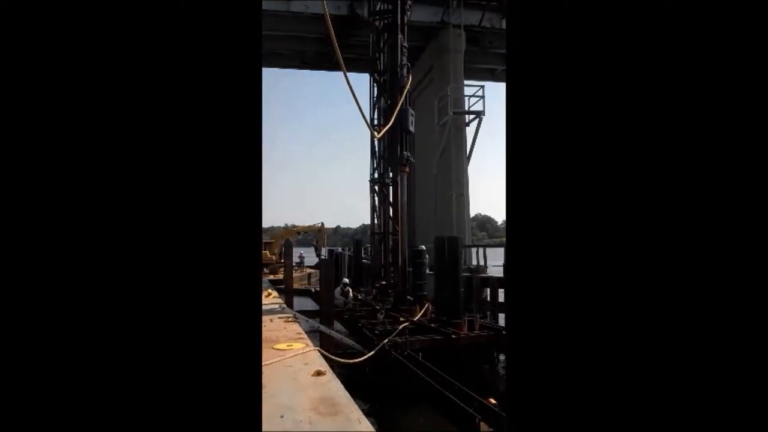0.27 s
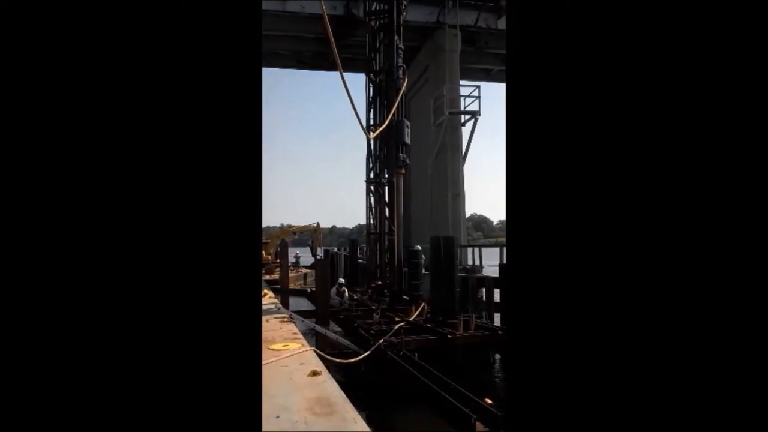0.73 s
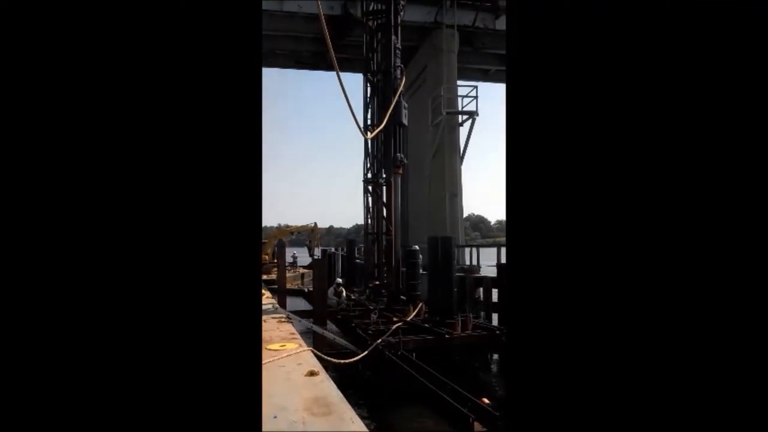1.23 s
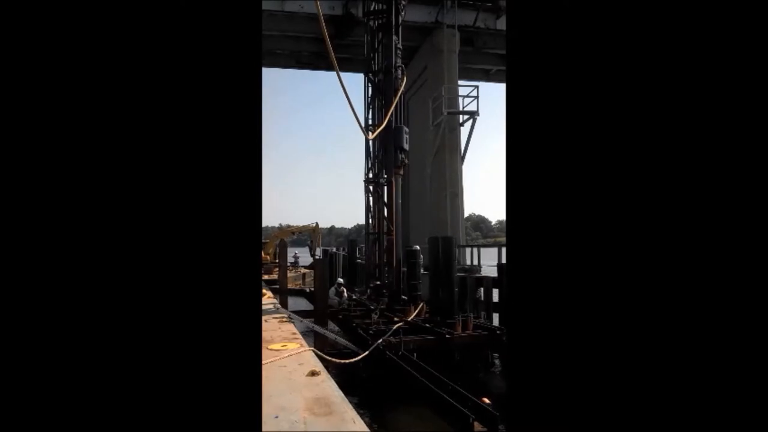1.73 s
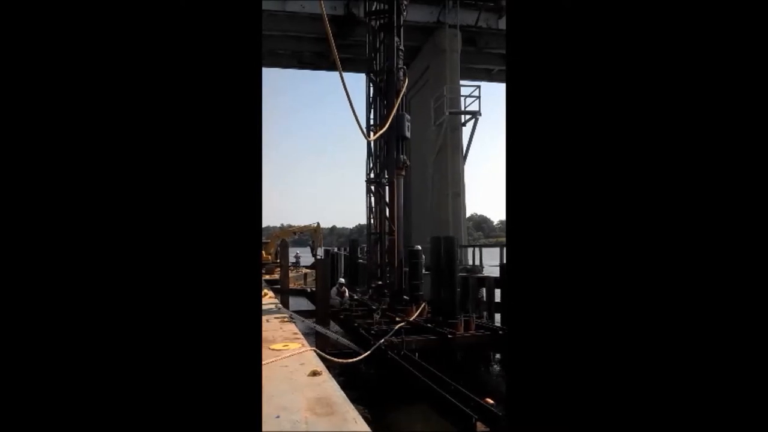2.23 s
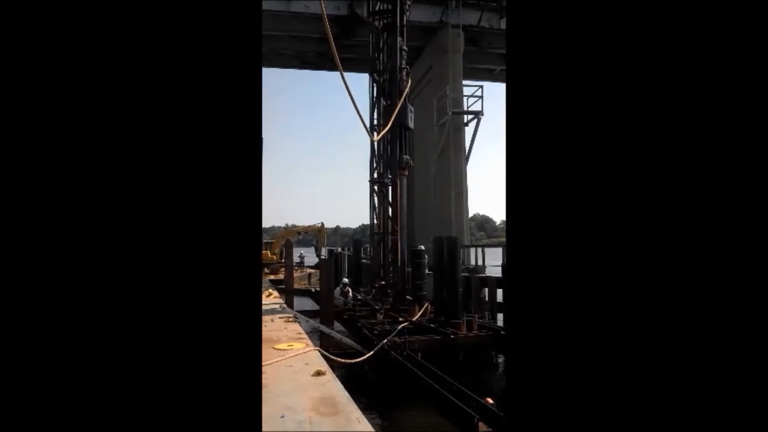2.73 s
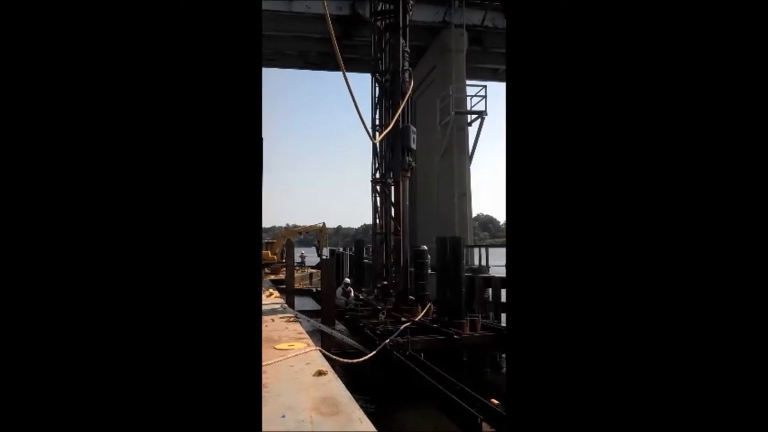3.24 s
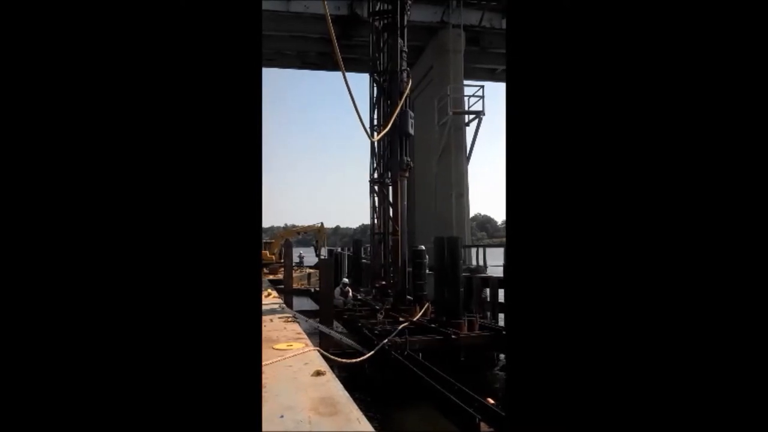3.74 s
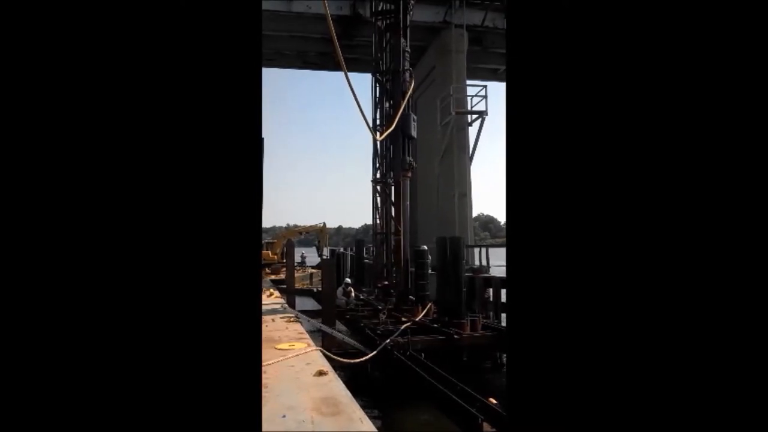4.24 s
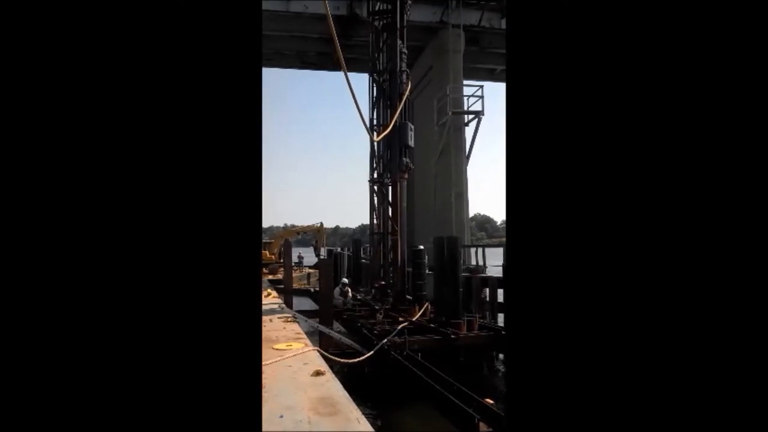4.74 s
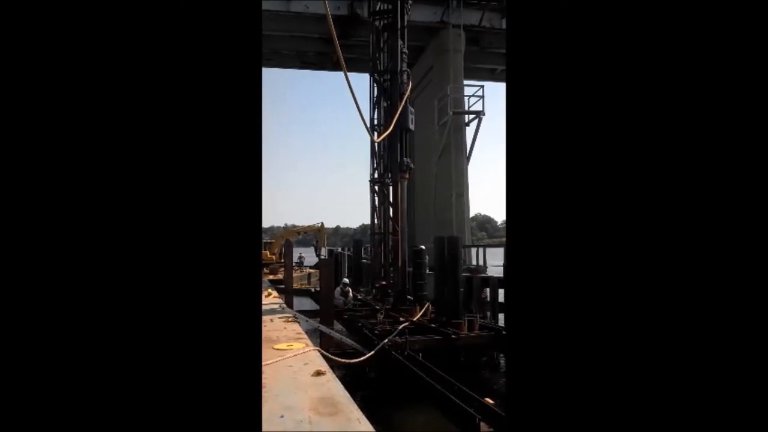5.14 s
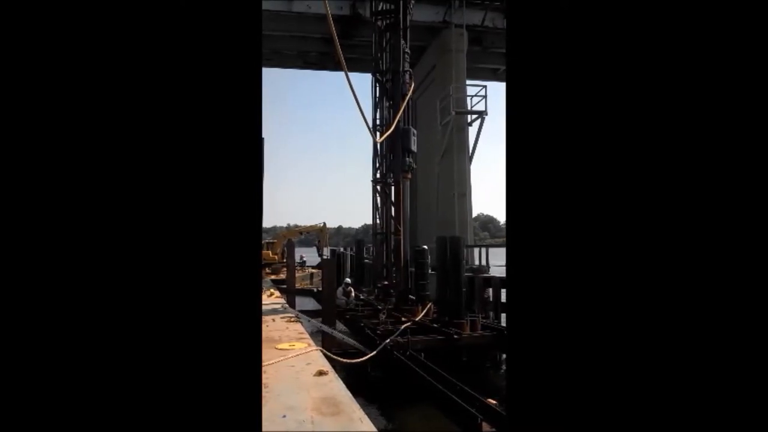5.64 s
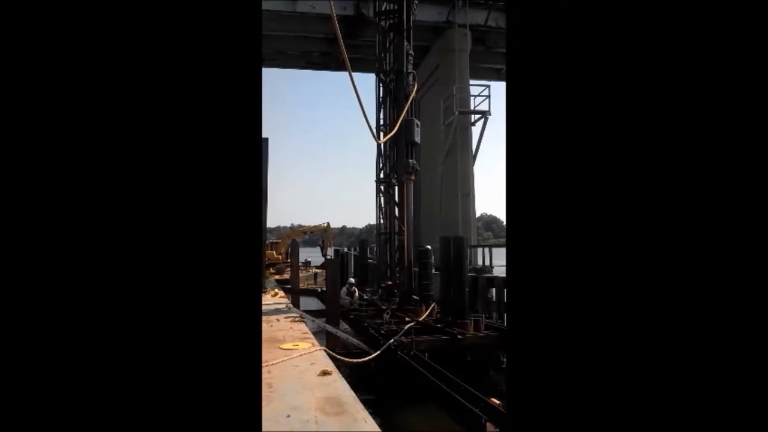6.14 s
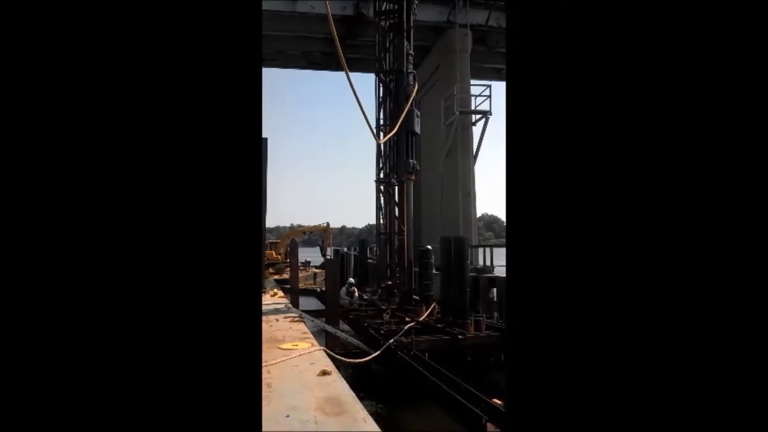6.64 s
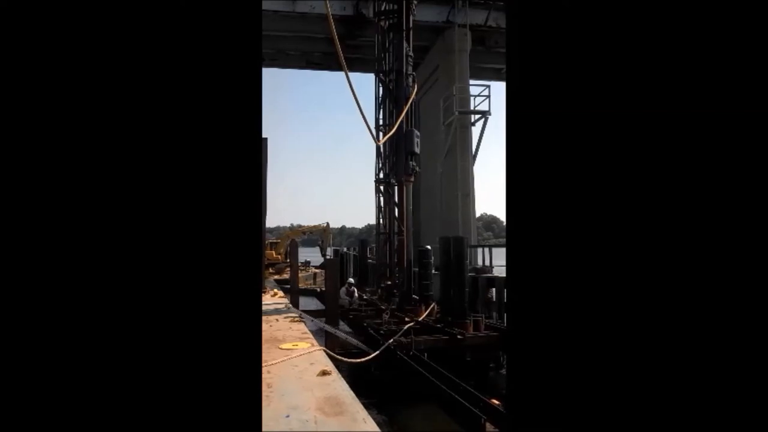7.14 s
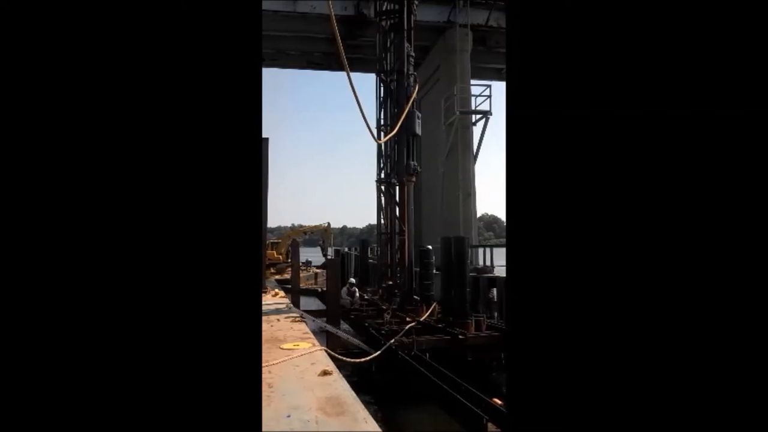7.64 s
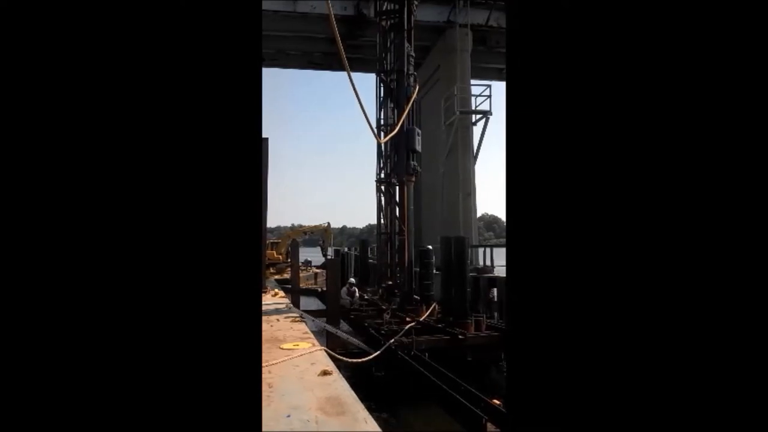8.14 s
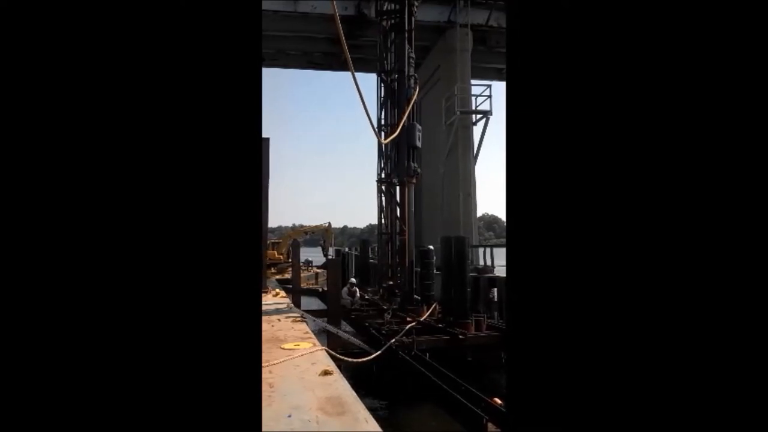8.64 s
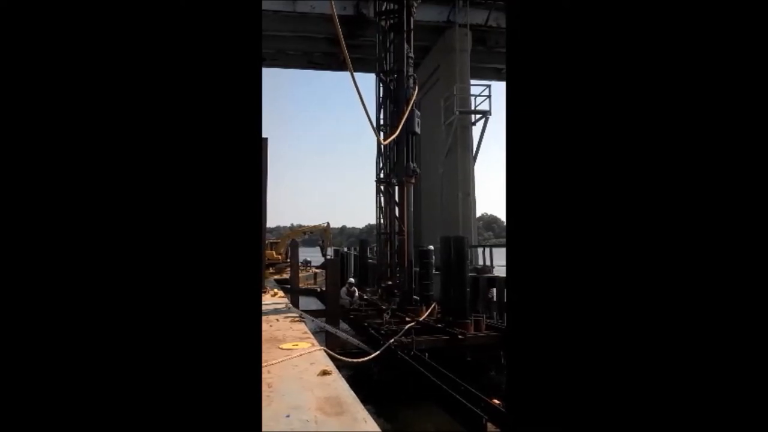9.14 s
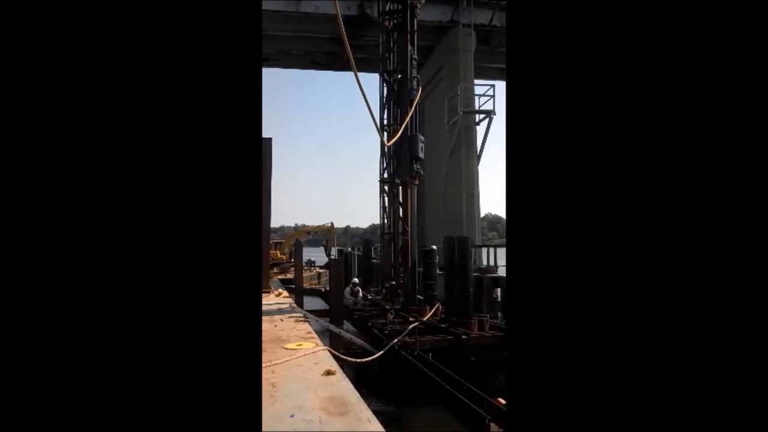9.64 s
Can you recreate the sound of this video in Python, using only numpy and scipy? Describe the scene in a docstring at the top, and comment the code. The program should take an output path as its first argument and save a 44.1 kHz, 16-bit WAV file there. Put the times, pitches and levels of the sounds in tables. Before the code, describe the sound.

Under a bridge beside water, an air hammer drives a pile. A soft exhaust puff comes first, then a short valve rasp and a hard metallic blow with a fast stuttering thud, booming reflection and ringing steel. The cycle repeats every 1.3 seconds, eight blows in all, over a constant compressor drone and hiss. A phone nearby captures it in stereo, mildly compressing the peaks.

```python
"""An air hammer drives a pile under a bridge by the water. Each stroke is a valve rasp, a blow whose thud
bounces down the pile, a swell thrown back by deck and piers, ringing steel, then a puff of exhaust air.
Impacts and air are noise dying band by band; steel is dying sine modes, some kept shaking by loose parts.
Loose steel clinks a few times, and behind it all a compressor drones and hisses.
A phone with two microphone ports and mild gain control listens."""
import sys
import numpy as np
from scipy import signal
from scipy.fft import rfft, irfft, next_fast_len
from scipy.io import wavfile
from scipy.ndimage import uniform_filter1d

SR = 44100
rng = np.random.default_rng(int(sys.argv[2]) if len(sys.argv) > 2 else 0)


def unload_wav(signal):
    """Save mono or channel-first audio to the path in sys.argv[1] as 16-bit WAV at rate SR, clipped to [-1, 1]."""
    wavfile.write(
        sys.argv[1],
        SR,
        np.round(np.clip(np.atleast_2d(signal).T, -1, 1) * 32767).astype(np.int16),
    )


N = 436149
PAD, LONG = 4410, 45000  # lead-in before time zero and longest single sound, samples

# Bright colour of steel hitting steel. Each row: frequency in Hz, relative level in dB.
SNAP_COLOUR = [(1500, -32), (3000, 6), (7000, -3.5), (11500, -7), (15500, -8)]


def blow(mix, s, db, helmet_db, ram_db):
    """One stroke: contact crack and bouncing thud, then the late loud return while the steel rings."""
    contact(mix, s, db)
    pile_thud(mix, s, db)
    bridge_swell(mix, s, db)
    ringing_steel(mix, s, db, helmet_db, ram_db)


def contact(mix, s, db):
    """Ram meets anvil: a broad crack, a very short bright snap and a shaken ping."""
    # Crack colour. Each row: frequency in Hz, relative level in dB.
    crack_colour = [(40, -30), (95, -30), (150, -18), (400, 9), (700, -1), (1400, -0.5), (2200, -6),
                    (3500, -7), (5500, -8.5), (8000, -11), (11000, -21), (15500, -23)]
    # How fast the crack dies. Each row: frequency in Hz, time to fall 60 dB in seconds.
    crack_t60 = [(150, 0.7), (500, 0.94), (1500, 1), (4000, 0.18), (10000, 0.13)]
    # How fast the snap dies. Each row: frequency in Hz, time to fall 60 dB in seconds.
    snap_t60 = [(3000, .06), (10000, 0.02)]
    # Anvil ping modes. Each row: pitch in Hz, level in dB, time to fall 60 dB in seconds.
    anvil = [(6900, 3.5, 0.022), (3060, -28, 0.048)]
    crack_db, snap_db, ping_db = -10.5, -14, -9  # against the strength of the blow
    crack = burst(crack_colour, crack_t60, rise=0.0027, hold=0.01, spit_db=0.5)
    snap = burst(SNAP_COLOUR, snap_t60, rise=0.00031, hold=0.0031, spit_db=1.0)
    ping = rattle(anvil, rise=0.00089, width=360)
    add(mix, s, gain_of(db + crack_db) * crack)
    add(mix, s, gain_of(db + snap_db) * snap)
    add(mix, s, gain_of(db + ping_db) * ping)


def pile_thud(mix, s, db):
    """The pile body's low modes, repeated for each return along the pile."""
    # Pile body modes. Each row: pitch in Hz, level in dB, time to fall 60 dB in seconds.
    pile_modes = [(146, -12.5, 0.029), (291, 6.5, 0.01), (398, -2.5, 0.019), (560, -7.5, 0.016),
                  (284, -19.5, 0.26)]
    time_scatter, level_scatter_db = .006, 1.5  # random spread of delay (share of it) and of level
    # the slim pile radiates little deep bass
    low_cut = signal.butter(4, 135, "high", fs=SR, output="sos")
    thud = signal.sosfilt(low_cut, ring(pile_modes, rise=0.0026)[:8000])
    delays, levels = bounces()
    scatter = rng.standard_normal((len(delays), 2))
    for delay, return_db, (late, loud) in zip(delays, levels, scatter):
        start = s + 0.0012 + delay * (1 + time_scatter * late)
        add(mix, start, gain_of(db + return_db + level_scatter_db * loud) * thud)


def bounces():
    """Delays (s) and levels (dB) of the thud's trips down the pile and back, for the blow and each rebound."""
    # The ram rebounds and lands again. Each entry: level of that landing's first thud in dB.
    rebound_db = [7, 5]
    rebound_s, rebound_loss_db = .0395, -4.5  # time between landings; change per trip after a rebound
    round_trip_s, trip_loss_db = .0079, -.2  # one trip along the pile; change per trip after the blow
    thud_db, first_db = 6, -3  # level of the blow's returns; offset of its very first thud
    trip = np.arange(5)
    delays = [landing * rebound_s + trip * round_trip_s for landing in range(len(rebound_db) + 1)]
    levels = [thud_db + trip * trip_loss_db + (trip == 0) * first_db]
    levels += [landing_db + trip * rebound_loss_db for landing_db in rebound_db]
    return np.ravel(delays), np.ravel(levels)


def bridge_swell(mix, s, db):
    """Deck and piers throw the blow back as a late, slowly rising swell with a darker lingering tail."""
    # Colours of swell and tail. Each row: frequency in Hz, relative level in dB.
    swell_colour = [(40, -23), (95, -21), (130, -7), (270, 8), (400, 4), (600, -2), (1100, -5.5),
                    (1500, -7), (2200, -9.5), (3500, -18.5), (5500, -21.5), (8000, -27.5), (11000, -35.5),
                    (15500, -33.5)]
    linger_colour = [(40, -34.2), (80, -30), (120, -7.5), (180, -7.5), (270, -1), (400, -4.5), (600, -0.5),
                     (900, -4.5), (1400, -2.5), (2200, -8.5), (3500, -24), (5500, -43), (8000, -38.4),
                     (11000, -49.4), (15500, -49.9)]
    # How fast swell and tail die. Each row: frequency in Hz, time to fall 60 dB in seconds.
    swell_t60 = [(150, 0.066), (500, 0.41), (1500, 0.19), (4000, 0.55), (10000, 0.37)]
    linger_t60 = [(150, 1.58), (500, 1.91), (1500, 0.51), (4000, 0.95), (10000, 0.27)]
    swell_db, linger_db = -0.5, -12  # against the strength of the blow
    swell = burst(swell_colour, swell_t60, rise=0.048, hold=0.0088, spit_db=3)
    linger = burst(linger_colour, linger_t60, rise=0.033, hold=0.027, spit_db=2.1)
    add(mix, s + .026, gain_of(db + swell_db) * swell)
    add(mix, s + .03, gain_of(db + linger_db) * linger)


def ringing_steel(mix, s, db, helmet_db, ram_db):
    """Frame, helmet, ram and guide ring on after the rebound, opened by a bright clatter."""
    # One list of modes each for frame, helmet, ram and guide.
    # Each row: pitch in Hz, level in dB, time to fall 60 dB in seconds.
    steel_parts = [
        [(348, 9.5, 0.5), (408, 0, 0.35), (519, 2, 0.92), (642, 1, 0.23), (767, -7, 0.93), (1170, 2.5, 0.9),
         (1266, 8.5, 0.22), (1460, 3, 0.34)],
        [(1980, 18, 0.87), (1960, 13.5, 0.52), (1840, 7, 0.91), (2140, 2, .5)],
        [(3970, 14, 0.51), (4120, 6, 0.82), (4030, 9, 0.39), (4040, -14, 9.6)],
        [(5350, 1.5, .45), (5830, -7, .9)],
    ]
    # How roughly loose parts shake frame, helmet, ram and guide. Each entry: rate in Hz.
    shake_hz = [50, 220, 260, 100]
    # How fast the clatter dies. Each row: frequency in Hz, time to fall 60 dB in seconds.
    clatter_t60 = [(3000, .25), (10000, 0.32)]
    clatter_db, frame_db, guide_db = -24.5, -21.5, -24  # against the strength of the blow
    start = s + .052
    clatter = burst(SNAP_COLOUR, clatter_t60, rise=0.0068, hold=0.022, spit_db=1)
    add(mix, start, gain_of(db + clatter_db) * clatter)
    levels = (db + frame_db, helmet_db, ram_db, db + guide_db)
    for modes, width, ring_db in zip(steel_parts, shake_hz, levels):
        add(mix, start, gain_of(ring_db) * rattle(modes, rise=0.0037, width=width))


def valve_rasp(mix, s, db, hold):
    """Air rasps through the valve as the ram drops, and the valve rings with it."""
    # Rasp colour. Each row: frequency in Hz, relative level in dB.
    rasp_colour = [(100, -25), (400, 8), (1400, 7.5), (2200, 6), (3500, 4), (5500, -2.5), (8000, -11.5),
                   (11000, -20), (15500, -29)]
    # How fast the rasp dies. Each row: frequency in Hz, time to fall 60 dB in seconds.
    rasp_t60 = [(150, 0.43), (500, 0.82), (1500, 1), (4000, 1), (10000, 0.66)]
    # Valve modes. Each row: pitch in Hz, level in dB, time to fall 60 dB in seconds.
    valve_modes = [(1840, -9, 0.21), (4580, -11, 0.12)]
    valve_db = 8.5  # against the rasp
    rasp = burst(rasp_colour, rasp_t60, rise=0.015, hold=hold, spit_db=1.5)
    add(mix, s - .007, gain_of(db) * rasp)
    add(mix, s, gain_of(db + valve_db) * rattle(valve_modes, rise=0.01, width=120))


def exhaust_puff(mix, s, db):
    """Spent air puffs out as the ram lifts: soft-edged noise with a breathy tail."""
    # Puff colour. Each row: frequency in Hz, relative level in dB.
    puff_colour = [(40, -34), (80, -27), (120, -30), (180, -21), (270, -4.5), (400, -6.5), (600, 0),
                   (900, -2), (1400, 0), (2200, -1), (3500, -3.5), (5500, -5), (8000, -9.5), (11000, -19),
                   (15500, -16)]
    # How fast the puff dies. Each row: frequency in Hz, time to fall 60 dB in seconds.
    puff_t60 = [(150, 0.59), (500, 0.72), (1500, 0.78), (4000, 0.7), (10000, 0.48)]
    puff = burst(puff_colour, puff_t60, rise=0.038, hold=0.016, spit_db=1.5)
    add(mix, s - .022, gain_of(db) * puff)


def clink(mix, s, db, hz):
    """A tiny clink of loose steel: two quickly dying modes."""
    modes = [(hz, 0, .04), (hz * 1.4, -5, .03)]
    add(mix, s, gain_of(db) * ring(modes, rise=0.00048))


def compressor():
    """Patchy drone and leak hiss from one coloured noise, with a few fuzzy tones."""
    # Drone and hiss colour. Each row: frequency in Hz, relative level in dB.
    drone_colour = [(40, -33), (78, -16.5), (100, 2.5), (125, -4.5), (270, 0), (400, -1), (600, -1.5),
                    (900, -2), (1400, -7), (2200, -12), (3500, -15.5), (5500, -18.5), (8000, -23),
                    (11000, -32.5), (15500, -23.5)]
    # Compressor tones. Each row: pitch in Hz, width in Hz, level in dB.
    whine = [(4570, 140, -54), (271, 26, -58), (130.5, 3.5, -54)]
    drone_db, wander_db, patch_db = -38, 1.5, 2.52
    t = np.arange(N) / SR
    size = next_fast_len(N)
    _, spectra = hiss(drone_colour, size)
    bins, _, frames = signal.stft(irfft(spectra, size), SR, nperseg=1024)

    # level patches a few bins wide and a few frames long
    chance = rng.standard_normal(frames.shape[1:])
    patches = evened(uniform_filter1d(uniform_filter1d(chance, 6, 0), 4, 1))
    # a slow wander of the low end, fading out from 750 to 2250 Hz
    wander = drift(N + 2048, 1.0).real[::512][:frames.shape[2]]
    load_db = wander_db * wander * np.clip(1.5 - bins[:, None] / 1500, 0, 1)
    frames = frames * gain_of(patch_db * patches + load_db + drone_db)
    out = signal.istft(frames, SR, nperseg=1024)[1][:, :N]

    for hz, width, db in whine:
        level = gain_of(db + 2.2 * drift(N, 6.6).real)
        out += level * (drift(N, width) * np.exp(2j * np.pi * hz * t)).real
    return out


def burst(colour, decays, rise, hold, spit_db):
    """Noise that rises, holds (s), and then dies band by band, each band spitting unevenly."""
    hz, spectra = hiss(colour, LONG)
    t = np.arange(LONG) / SR
    centres, t60 = np.transpose(decays)
    after = np.maximum(t - rise - hold, 0)
    out = np.zeros((2, LONG))
    for pick, band_t60 in zip(np.eye(len(t60)), t60):
        band = irfft(spectra * read(hz, centres, pick))  # overlapping bands that sum to the whole
        spit = spit_db * drift(LONG, 90).real
        out += band * gain_of(spit - 60 * after / band_t60)
    return out * np.sin(np.minimum(t / rise, 1) * np.pi / 2) ** 2


def ring(modes, rise):
    """Free steel: sine modes that die exponentially after a soft start."""
    t = np.arange(LONG) / SR
    dying = (gain_of(db - 60 * t / t60) * np.sin(2 * np.pi * hz * t) for hz, db, t60 in modes)
    return sum(dying) * (1 - np.exp(-t / rise))


def rattle(modes, rise, width):
    """Modes kept shaking by loose parts: each wanders in size and phase while it dies."""
    t = np.arange(LONG) / SR
    out = np.zeros(LONG)
    for hz, db, t60 in modes:
        shaking = .3 + drift(LONG, width)  # a small steady part under the wander
        out += gain_of(db - 60 * t / t60) * (np.exp(2j * np.pi * hz * t) * shaking).real
    return out * (1 - np.exp(-t / rise))


def drift(size, width):
    """Complex random wander of power 1, changing about width times a second, positive frequencies only."""
    step = 16  # samples between drawn points
    count = next_fast_len(size // step + 2)
    hz = np.fft.fftfreq(count, step / SR)
    spectrum = np.fft.fft(rng.standard_normal(count))
    z = np.fft.ifft(spectrum * (hz > 0) / (1 + (2 * hz / width) ** 2))
    z = z / np.sqrt(np.mean(abs(z) ** 2))
    return np.interp(np.arange(size) / step, np.arange(count), z)


def hiss(colour, size):
    """Frequencies, and spectra of two unrelated noises of one colour and power 1."""
    hz = np.fft.rfftfreq(size, 1 / SR)
    shape = gain_of(read(hz, *np.transpose(colour)))
    return hz, rfft(rng.standard_normal((2, size))) * evened(shape)


def gain_of(db):
    """Amplitude factor for a level in dB."""
    return 10 ** (np.asarray(db) / 20)


def evened(x):
    """Scale to power 1."""
    return x / np.sqrt(np.mean(x ** 2) + 1e-20)


def read(hz, points, values):
    """Read a curve between its points on a log frequency scale."""
    return np.interp(np.log(hz + 1), np.log(np.asarray(points) + 1), values)


def add(mix, s, sound):
    """Lay a sound into both rows at s seconds, cut off at the end of the mix."""
    part = mix[:, PAD + round(s * SR):][:, :sound.shape[-1]]
    part += sound[..., :part.shape[1]]


def scene():
    """Two fields of the same make: noises unrelated between the rows, steel and compressor tones shared."""
    # Hammer blows. Each row: start in seconds, strength in dB, helmet ring in dB, ram ring in dB.
    blows = [(0.5241, -8.5, -37.5, -39.5), (1.8112, -8.5, -43, -43), (3.109, -9, -35, -36),
             (4.491, -8.5, -45, -38), (5.75, -8.5, -39.5, -41), (7.0234, -7.5, -47, -43),
             (8.312, -8, -50, -41), (9.5929, -7.5, -47, -57)]
    # Valve rasps as the ram drops. Each row: time in seconds, level in dB, hold in seconds.
    rasps = [(0.483, -31.5, 0.015), (1.772, -30.5, 0.01), (3.072, -30.5, 0.014), (4.416, -31.5, 0.075),
             (5.7132, -30.5, 0.027), (6.988, -32.5, 0.015), (8.276, -33.5, 0.013), (9.556, -31, 0.014)]
    # Exhaust puffs as the ram lifts. Each row: time in seconds, level in dB.
    puffs = [(-.02, -19.5), (1.27, -19), (2.572, -18.5), (3.987, -19), (5.2, -18), (6.48, -18),
             (7.766, -18), (9.043, -20)]
    # Clinks of loose steel. Each row: start in seconds, level in dB, pitch in Hz.
    clinks = [(3.42, -27, 1970), (3.489, -28, 2060), (8.999, -34, 2000)]
    mix = np.zeros((2, N + PAD))
    for row in blows:
        blow(mix, *row)
    for row in rasps:
        valve_rasp(mix, *row)
    for row in puffs:
        exhaust_puff(mix, *row)
    for row in clinks:
        clink(mix, *row)
    return mix[:, PAD:] + compressor()


def record(dry):
    """Two ports of opposite sign with a small lag, slight ducking around loud sound, overload, band limit."""
    # Right port against left. Each row: frequency in Hz, likeness from 0 to 1, gain in dB,
    # extra lag of the left in radians.
    ports = [(40, 0, 4, .3), (89.4, 0.8, -5.5, 0.98), (175.6, 0.61, 8, 1.94), (259, 0.79, 2.5, 3.67),
             (315, 0.76, 7, 4.82), (407, 0.55, 4, 6.59), (557, 0.92, 0, 7.19), (700, 1, 3, 6.84),
             (810, 0.91, 3.5, 7.7), (905, 1, 2, 6.18), (1480, 0.99, 0.4, 6.23), (3000, 0.96, -0.5, 6.245),
             (16000, 1, 0, 6.43)]
    port_lag = 16  # samples by which the left port trails, before the extra lag
    size = next_fast_len(N + 4096)
    hz = np.fft.rfftfreq(size, 1 / SR)
    field, other_field = rfft(dry, size)
    points, *columns = np.transpose(ports)
    same, gain_db, turn = (read(hz, points, column) for column in columns)
    same = np.clip(same, 0, 1)
    right = -(same * field + np.sqrt(1 - same ** 2) * other_field) * gain_of(gain_db)
    left = field * np.exp(-1j * (turn + 2 * np.pi * hz * port_lag / SR))
    pair = irfft(np.array([left, right]), size)[:, :N]

    # gain control: the level above -23.5 dB is held, let go at 17.5 dB a second, and partly taken off
    power_db = 10 * np.log10(abs(uniform_filter1d((pair ** 2).mean(0), 600)) + 1e-12)
    fall = np.arange(N) * 17.5 / SR
    held_db = np.maximum.accumulate(power_db + fall) - fall
    over_db = np.maximum(held_db + 23.5, 0)
    ducked = pair / gain_of(0.32 * uniform_filter1d(over_db, 400))
    ducked = 1.174 * np.tanh(ducked / 1.052)  # soft overload

    band_limit = signal.firwin(511, 15800, window=("kaiser", 9), fs=SR)  # low-pass, edge in Hz
    return signal.oaconvolve(ducked, band_limit[None], "same")


dry = scene()
out = record(dry)
unload_wav(out)
```